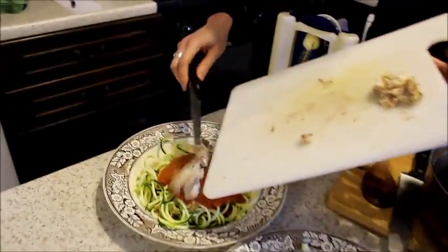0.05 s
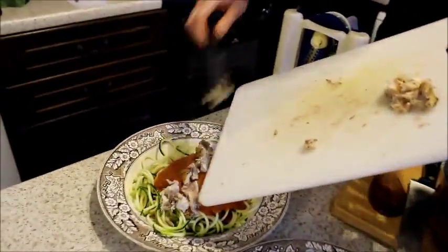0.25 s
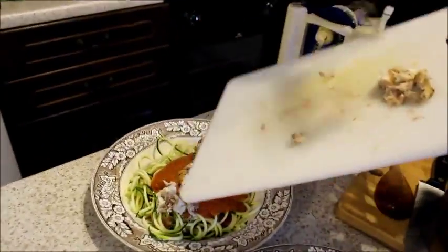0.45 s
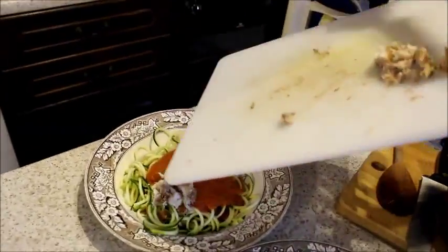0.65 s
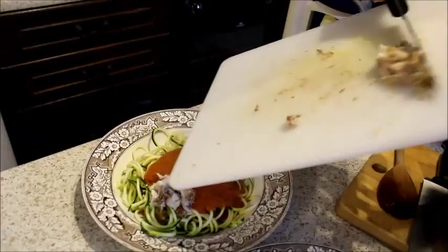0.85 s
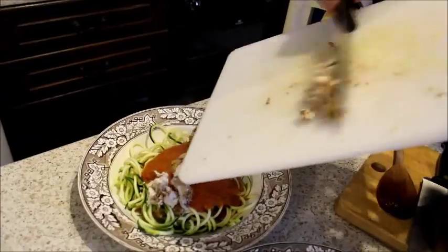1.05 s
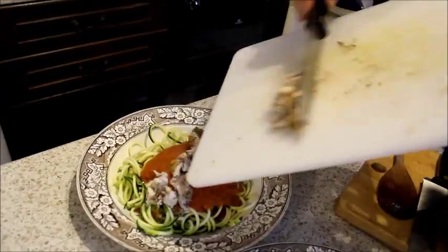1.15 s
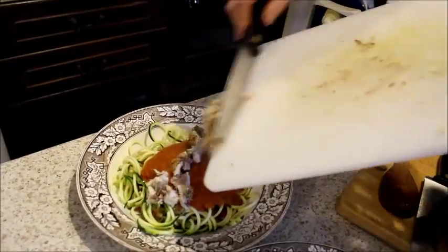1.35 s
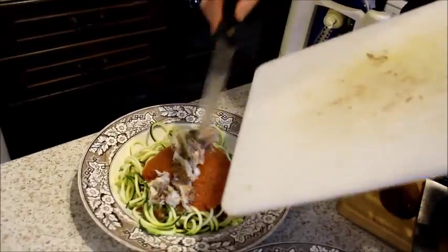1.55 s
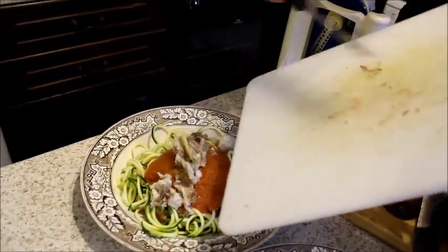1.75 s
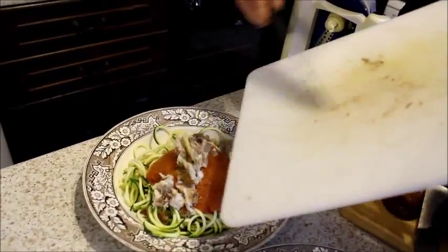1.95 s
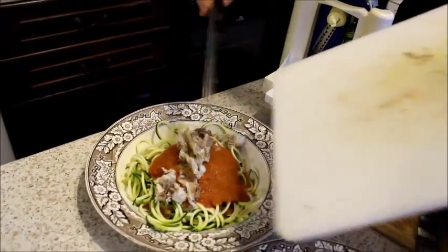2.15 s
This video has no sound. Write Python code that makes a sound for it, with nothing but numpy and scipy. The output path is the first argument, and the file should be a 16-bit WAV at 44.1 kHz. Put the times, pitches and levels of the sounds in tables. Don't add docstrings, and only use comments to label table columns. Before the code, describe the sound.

Close in a hard-walled kitchen, a blade lands with a loud clack and rasps down a plastic board for over half a second, after faint wet food drops; a pause, then a blunt knock and brief skid.

```python
import sys
import numpy as np
from scipy import signal
from scipy.fft import rfft, irfft
from scipy.io import wavfile
from scipy.ndimage import uniform_filter1d, map_coordinates

SR = 44100
rng = np.random.default_rng(int(sys.argv[2]) if len(sys.argv) > 2 else 0)


def transcribe(u):
    v = np.clip(np.atleast_2d(u).T, -1, 1)
    q = np.round(v * 32767).astype(np.int16)
    wavfile.write(sys.argv[1], SR, q)


def decibels_to_gain(level_db):
    exponent = np.asarray(level_db, float) / 20
    return 10 ** exponent


N = 97020

# time in seconds, drag level in dB, brightness in dB.
STROKE = [
    (0.799, -26, -5),
    (.9, -34, -2),
    (0.959, -28.5, 0),
    (1.04, -25.5, 2.5),
    (1.148, -30.5, 6),
    (1.2, -25.5, -0.5),
    (1.33, -27, 0.5),
    (1.385, -26.5, 3),
    (1.471, -35, 10),
]
# time in seconds, drag level in dB, brightness in dB.
SKID = [
    (1.984, -31, 4),
    (2.01, -31, 3.5),
    (2.04, -33, 5),
    (2.067, -33.5, 3),
    (2.092, -49, 10),
]
# pitch in Hz, width in Hz, level in dB, loudest moment in seconds, loss away from it in dB.
BOARD_MODES = [(286, 29, -3, 0.973, 14), (372.7, 30, -7, 1.075, 13.5), (565, 38, -6.5, 1.307, 15.5),
               (506, 25, -14.5, 1.2, 1), (622, 69, -4.5, 1.13, 9), (775.6, 26, -2.5, 1.39, 10.5),
               (1045, 28, -5.5, 1.07, 6), (1315, 60, -11.5, 1.04, 10.5), (1820, 65, -3, 1.025, 10.5),
               (2180, 94, -5, 1.31, 8.5), (2780, 67, -14.5, 1.1, -0.5), (3492, 104, -4, 1.237, 14),
               (4546, 135, -1.5, 0.884, 9.5), (4610, 140, -5.5, 1.524, 8.5)]
# pitch in Hz, width in Hz, level in the stroke in dB, level in the skid in dB.
BLADE_MODES = [(5750, 74, -16, -6), (6450, 250, -20, -36), (6720, 260, -19.5, -16), (7600, 520, -16, -16.5),
               (8540, 110, -26, -21), (9100, 370, -19.5, -28), (9760, 110, -24.5, -17),
               (10300, 240, -22.5, -30), (11200, 400, -31, -29), (11840, 220, -22.5, -31),
               (13500, 350, -27, -34), (15200, 400, -27, -38)]
# frequency in Hz, level in dB per Hz.
RASP_COLOUR = [(200, -48), (420, -8.5), (550, 0), (1500, -8), (2200, -6), (4500, -7), (8000, -16),
               (16000, -53)]
# time in seconds, half length in seconds, slips per second,
# level over the grit in dB, slip length in cycles.
CHATTER_RUNS = [
    (0.873, 0.19, 505, -3, 0.38),
    (0.936, 0.016, 369, 11.5, 0.69),
    (0.975, 0.022, 281, 0, 0.54),
    (1.092, 0.027, 320, 7, 0.24),
    (1.135, 0.017, 365, 15.5, 0.27),
    (1.286, 0.036, 505, 1.5, 0.34),
    (1.356, 0.013, 285, 10.5, 0.26),
    (1.384, 0.032, 256, 15, 0.059),
]

# time in seconds, level in dB, contact in ms, direction.
LANDING = [(.7989, -1, .2, -1), (.79985, -1.5, .2, 1), (.80033, -5, .16, 1), (.80055, -12, .13, 1),
           (.80068, -10, .17, -1), (.8009, -7, .2, -1), (.80108, -8, .15, 1), (.80125, -5, .2, -1),
           (.8041, -7, .25, -1), (.8058, -11, .3, -1), (.8072, -9, .3, 1), (.8115, -10, .2, -1),
           (.81175, -11, .25, 1)]
# time in seconds, level in dB, contact in ms, direction.
KNOCK = [
    (1.9834, -2.5, .48, -1),
    (1.984, 1, .58, 1),
    (1.9841, -24, .12, 1),
    (1.9874, -10, .13, -1),
    (1.9878, -15, .07, 1),
    (1.9884, -15, .07, -1),
    (1.9892, -11, .4, 1),
]
# time in seconds, level in dB, contact in ms, direction.
RIM_EXIT = [
    (1.4567, -26, 0.038, -0.64),
    (1.4663, -7, 0.095, 0.97),
    (1.4672, -17, 0.23, -0.63),
]
# time in seconds, level in dB.
CATCHES = [(1.0225, -10), (1.0415, -13), (1.0575, -15), (1.0715, -12), (1.0915, -25), (1.1, -26),
           (1.1035, -15), (1.139, -20), (1.357, -20), (1.3775, -19), (1.431, -22), (1.447, -19),
           (1.4514, -13)]
# pitch in Hz, level in dB, t60 in seconds.
LANDING_RING = [(257, -24.5, 0.19), (413, -23, 0.11), (500.6, -24, 0.24), (1138, -15.5, 0.034),
                (1340, -14.5, 0.057), (1730, -17, 0.045), (2520, -15, 0.03), (3150, -15, 0.02),
                (3560, -17, 0.02), (5040, -15, 0.03), (5800, -12, 0.017), ]
KNOCK_RING = [(270.5, -21.5, 0.13), (500, -11.5, 0.11), (570.6, -9.5, 0.081), (730, -20, 0.056),
              (954, -17, 0.033), (1300, -18, 0.03), (2290, -18, 0.03), (2778, -22, 0.02), (3800, -24, .02),
              ]
EXIT_RING = [(2170, 8, 0.0021), (4780, 7.5, 0.0041), (6500, -16, .004), (9100, -19, .004),
             (12300, 0, 0.0048), (14700, -3, .004)]
CATCH_RING = [(630, -13, .02), (2140, -6, 0.014), (3450, -10.5, .01), (4580, -2, 0.0087)]
# start in seconds, level in dB, t60 in seconds.
RATTLE = (.8015, -20.5, 0.042)
# frequency in Hz, level in dB per Hz.
RATTLE_COLOUR = [(120, -35), (200, -8), (867, -11), (1710, 1), (2020, -16), (3900, 0), (12200, -51),
                 (16000, -48)]

# time in seconds, level in dB, rise in seconds, fall in seconds, thud in dB.
PLOPS = [
    (.005, -39.5, 0.0058, 0.024, 2.5),
    (.052, -55, 0.0057, 0.0053, -8),
    (0.073, -34.5, 0.017, 0.022, -2.5),
    (0.103, -46.5, 0.02, 0.15, -11),
    (.2, -51, 0.058, 0.033, -27),
    (0.302, -64, 0.12, 0.56, -5),
]
# frequency in Hz, level in dB per Hz.
PATTER_COLOUR = [(240, -35), (400, 0.5), (439, -5), (496, 2), (730, -1.5), (3990, -3.5), (16000, -27)]
# pitch in Hz, width in Hz, level in dB.
BOWL_HOLLOW = [(773, 130, -1), (1050, 280, 2), (1710, 1000, 7), (3880, 22, -6), (4400, 190, -24)]
# pitch in Hz, width in Hz, level in dB.
THUD_MODES = [(152, 50, -33), (215, 52, 2), (284, 12, -0.5), (406, 37, -2)]
# time in seconds, level in dB, contact in ms, direction.
BITS = [
    (.06, -33, .15, 1),
    (0.0681, -30, 0.18, 0.94),
    (0.0776, -28.5, 0.17, -0.94),
    (.088, -37, 0.13, 0.92),
]
# pitch in Hz, level in dB, t60 in seconds.
BIT_RING = [(190, -4, 0.095), (803, -1.5, 0.044), (945, -1, 0.051), (1087, -1, 0.037), (1790, -7, 0.024),
            (4330, 2, .02)]
# time in seconds, pitch in Hz, level in dB, t60 in seconds.
RIM_PING = (.205, 3900, -55, 1.5)

# centre in Hz, t60 in seconds, level in dB.
ROOM = [(210, 0.3, -18.5), (522, 0.37, -10), (1250, 0.36, -7), (2270, 0.36, -5.5), (3510, 0.39, -5),
        (4750, 0.29, -8.5), (6250, 0.32, -7.5), (8350, 0.31, -4.5), (12000, 0.29, 2)]
# frequency in Hz, level in dB per Hz.
AIR_COLOUR = [(12, -29), (20, -16.5), (241, 0), (337, -6), (459, -0.5), (558, -4.5), (607, -6), (897, -10),
              (16000, -27)]
# pitch in Hz, rms level in dB.
HUM = [(49, -70), (98, -65.5), (141, -64)]

MODE_WANDER, CHATTER_WANDER = .008, .015
MODE_FLICKER_DB, BLADE_FLICKER_DB, PATCHY_DB = 2.0, 3.0, 1.5
NODE_SPACING_S = 0.59
LIFT_S = 0.0014
GRIT_DB, GRIT_GATE = 2.5, 0.82
RASP_DB, MODES_DB = -5, -4.5
BOARD_CUT_HZ, TAP_CUT_HZ = 290, 215
CLICK_DB, REBOUND_RING = 1, .2
CATCH_MS = .12
PLOP_GRAIN_DB = 2
ROOM_GAP_S, ROOM_DRIFT_MS = 0.0084, .14
AIR_DB = -50.5
TOP_HZ = 15600


def drag(t, curve, blade_column):
    s, db, bright_db = (np.array(c) for c in zip(*curve))
    touch = np.clip((t - s[0]) / LIFT_S, 0, 1) * np.clip((s[-1] + LIFT_S - t) / LIFT_S, 0, 1)
    force = touch * decibels_to_gain(np.interp(t, s, db) + PATCHY_DB * walk(30.92))
    bright = decibels_to_gain(np.interp(t, s, bright_db))
    kicks, gate = chatter(t)
    push = (grit(GRIT_DB) * gate + 0.17 * kicks) * force

    modes = 0
    for hz, width, mode_db, loudest, loss in BOARD_MODES:
        away = np.sin(np.pi * np.clip((t - loudest) / NODE_SPACING_S, -.5, .5)) ** 2
        gain = decibels_to_gain(mode_db + MODE_FLICKER_DB * walk(20.07) - loss * away)
        if hz > 1500:
            gain = gain * bright
        modes = modes + loose_ring(push * gain, hz, width) * np.sqrt(4 * np.pi * width / SR)
    for row in BLADE_MODES:
        hz, width = row[:2]
        gain = bright * decibels_to_gain(row[blade_column] + BLADE_FLICKER_DB * walk(8.85))
        modes = modes + loose_ring(push * gain, hz, width) * np.sqrt(4 * np.pi * width / SR)

    rasp = colour(grit(GRIT_DB) * gate * force * bright, RASP_COLOUR)
    rasp = rasp / np.std(colour(rng.standard_normal(N), RASP_COLOUR))
    return decibels_to_gain(MODES_DB) * modes + decibels_to_gain(RASP_DB) * rasp


def chatter(t):
    kicks, gate = 0, 1
    for s, half, rate, db, width in CHATTER_RUNS:
        cycle = np.cumsum(rate * (1 + CHATTER_WANDER * walk(60)) / SR) % 1
        slip = np.exp(-cycle / width)
        slip = (slip - slip.mean()) / slip.std()
        spell = np.exp(-((t - s) / half) ** 2)
        kicks = kicks + decibels_to_gain(db) * spell * slip * np.sqrt(width)
        if width < .25:
            gate = gate * np.maximum(1 + GRIT_GATE * spell * slip, .1)
    return kicks, gate / np.sqrt(uniform_filter1d(gate ** 2, size=1024))


def grit(spread_db):
    return level(rng.standard_normal(N) * decibels_to_gain(spread_db * rng.exponential(size=N)), 0)


def loose_ring(x, hz, width):
    out, driven = np.zeros(N), np.flatnonzero(x)
    live = slice(driven[0], driven[-1] + SR // 10)
    turn = np.exp(2j * np.pi * np.cumsum(hz * (1 + MODE_WANDER * walk(14)[live])) / SR)
    decay = np.exp(-np.pi * width / SR)
    out[live] = (turn * signal.lfilter([1], [1, -decay], x[live] / turn)).imag
    return out


def walk(rate):
    k = int(SR / rate)
    steps = np.repeat(rng.standard_normal(N // k + 1), k)
    w = uniform_filter1d(uniform_filter1d(steps, k), k)[:N]
    return w / w.std()


def colour(x, points):
    hz, db = np.array(points, float).T
    f = np.fft.rfftfreq(len(x), 1 / SR) + 1
    return irfft(rfft(x) * decibels_to_gain(np.interp(np.log(f), np.log(hz), db)), len(x))


def level(x, db):
    return x * decibels_to_gain(db) / np.sqrt(np.mean(x ** 2))


def blow(t, contacts, modes, rebound=REBOUND_RING):
    pushes = []
    for s, db, ms, sign in contacts:
        pushes.append(sign * decibels_to_gain(db) * np.exp(-.5 * ((t - s - ms / 2000) / (ms / 4000)) ** 2))
    drive = (pushes[0] + rebound * sum(pushes[1:])) / (SR * contacts[0][2] / 2000)
    rings = sum(decibels_to_gain(db) * ring(drive, hz, np.log(1000) / np.pi / t60) for hz, db, t60 in modes)
    return decibels_to_gain(CLICK_DB) * sum(pushes) - rings / 2


def ring(x, hz, width):
    p = np.exp((2j * np.pi * hz - np.pi * width) / SR)
    return signal.lfilter([1], [1, -p], x).imag


def rattle(t):
    s, db, t60 = RATTLE
    crackle = level(colour(grit(2.9), RATTLE_COLOUR), db)
    return crackle * (t > s) * decibels_to_gain(-60 * np.abs(t - s) / t60)


def food(t):
    grains = grit(PLOP_GRAIN_DB)
    hollow = sum(decibels_to_gain(db) * ring(grains, hz, w) * np.sqrt(w) for hz, w, db in BOWL_HOLLOW)
    thud = sum(decibels_to_gain(db) * ring(grains, hz, w) * np.sqrt(w) for hz, w, db in THUD_MODES)
    patter = level(colour(grains, PATTER_COLOUR), -1.54)
    patter = patter + level(colour(hollow, [(300, -27.5), (700, -19)]), -6)
    thud = level(colour(thud, [(60, -29), (130, 13)]), 0)

    out = blow(t, BITS, BIT_RING, rebound=0.89)
    for s, db, rise, fall, thud_db in PLOPS:
        swell = np.where(t < s, np.exp(-((t - s) / rise) ** 2), np.exp(-np.abs(t - s) / fall))
        out = out + decibels_to_gain(db) * swell * (patter + decibels_to_gain(thud_db) * thud)

    s, hz, db, t60 = RIM_PING
    fade = decibels_to_gain(db - 60 * np.abs(t - s) / t60 + 2.5 * walk(37))
    return out + fade * np.sin(2 * np.pi * hz * t) * (t > s)


def room(x):
    t = np.arange(SR // 2) / SR
    tail = 0
    for hz, t60, db in ROOM:
        band = [(row[0], -22. * (row[0] != hz)) for row in ROOM]
        noise = level(colour(rng.standard_normal(len(t)), band), 0) / np.sqrt(len(ROOM))
        tail = tail + noise * decibels_to_gain(db - 60 * t / t60) / np.sqrt(t60 * SR / 14)
    wet = signal.fftconvolve(x, tail * np.clip(t / ROOM_GAP_S, 0, 1) ** 2)[:N]
    drift = ROOM_DRIFT_MS * SR / 1000 * walk(30)
    return x + map_coordinates(wet, [np.arange(N) + drift], mode="nearest")


def kitchen_air(t):
    hum = sum(np.sqrt(2) * decibels_to_gain(db + 2.0 * walk(2.8)) * np.sin(2 * np.pi * hz * t) for hz, db in HUM)
    return level(colour(rng.standard_normal(N), AIR_COLOUR), AIR_DB) + hum


def highpass(x, order, hz):
    return signal.sosfilt(signal.butter(order, hz, "high", fs=SR, output="sos"), x)


def scene():
    t = np.arange(N) / SR
    knife = drag(t, STROKE, blade_column=2) + drag(t, SKID, blade_column=3)
    knife = highpass(knife, 6, BOARD_CUT_HZ)
    taps = blow(t, LANDING, LANDING_RING) + rattle(t)
    taps = taps + blow(t, KNOCK, KNOCK_RING) + blow(t, RIM_EXIT, EXIT_RING)
    catches = [(s, db, CATCH_MS, 1) for s, db in CATCHES]
    taps = taps + blow(t, catches, CATCH_RING, rebound=0.78)
    taps = highpass(taps, 3, TAP_CUT_HZ)
    return (room(knife + taps + food(t)) + kitchen_air(t))[None]


def roll_off(x):
    return signal.sosfilt(signal.butter(12, 16500, fs=SR, output="sos"), x)


def record(dry):
    top_cut = signal.ellip(8, .2, 60, TOP_HZ, fs=SR, output="sos")
    mix = signal.sosfilt(top_cut, np.clip(dry, -1, 1))
    return roll_off(mix)


dry = scene()
out = record(dry)
transcribe(out)
```